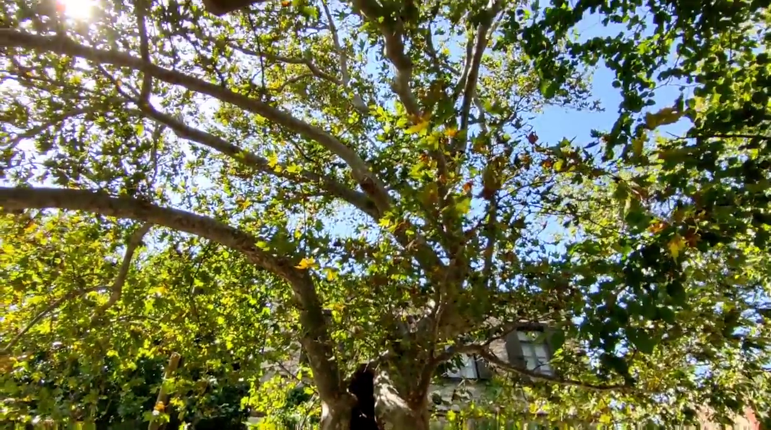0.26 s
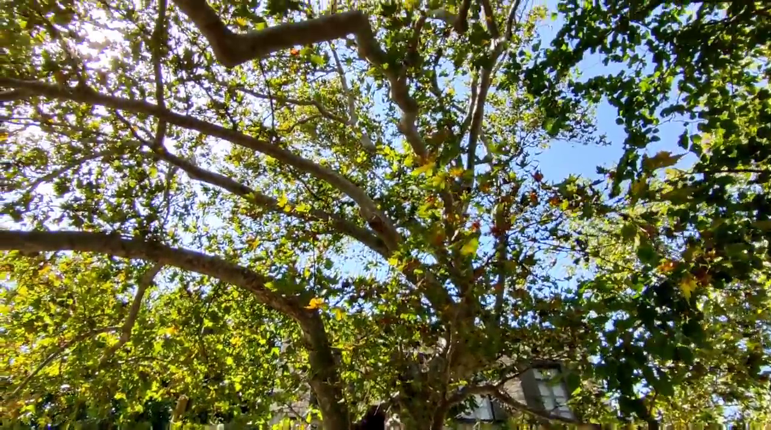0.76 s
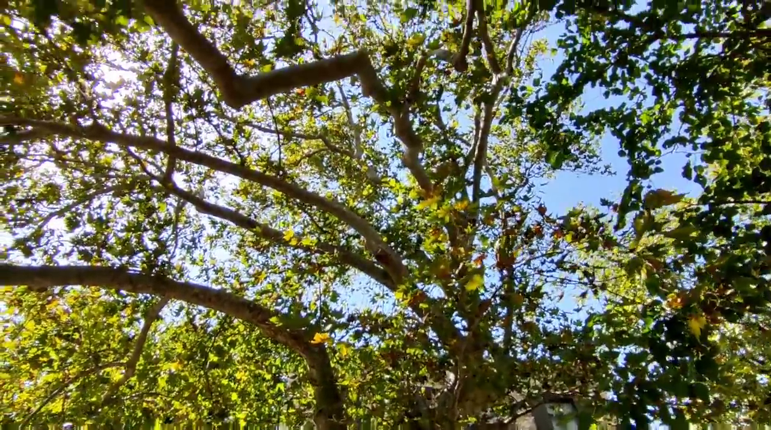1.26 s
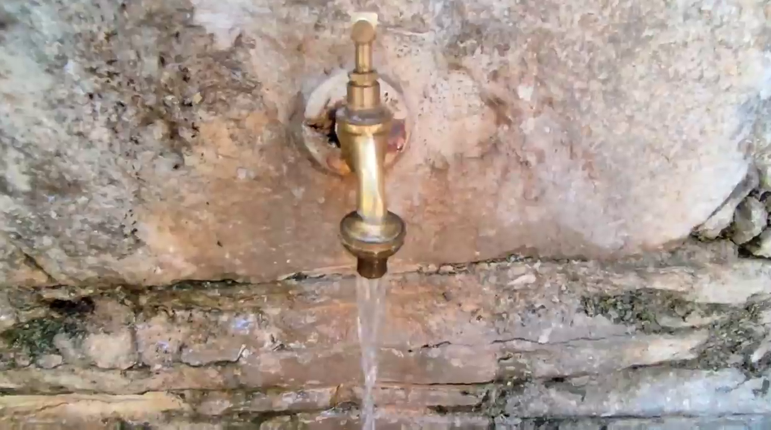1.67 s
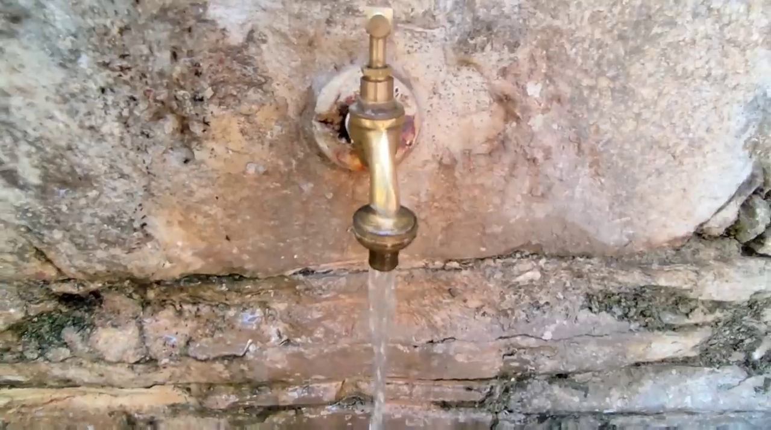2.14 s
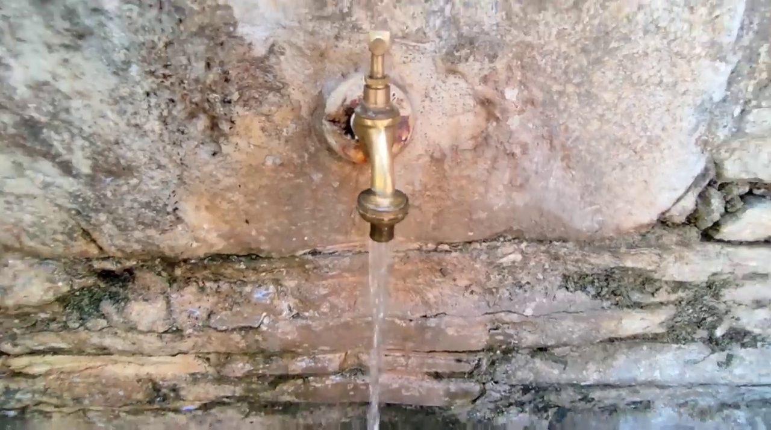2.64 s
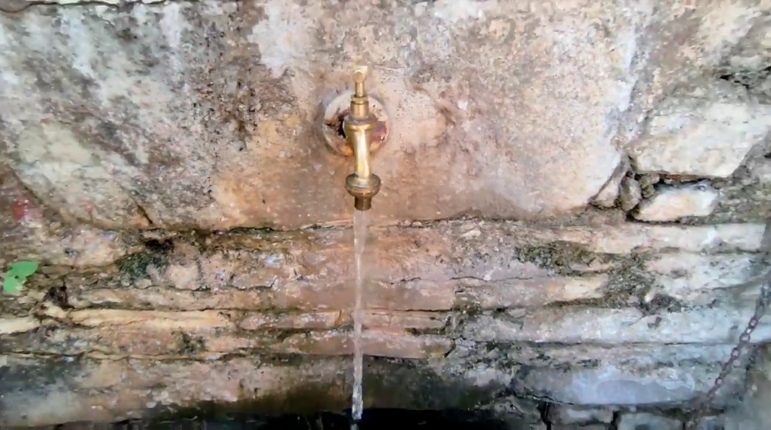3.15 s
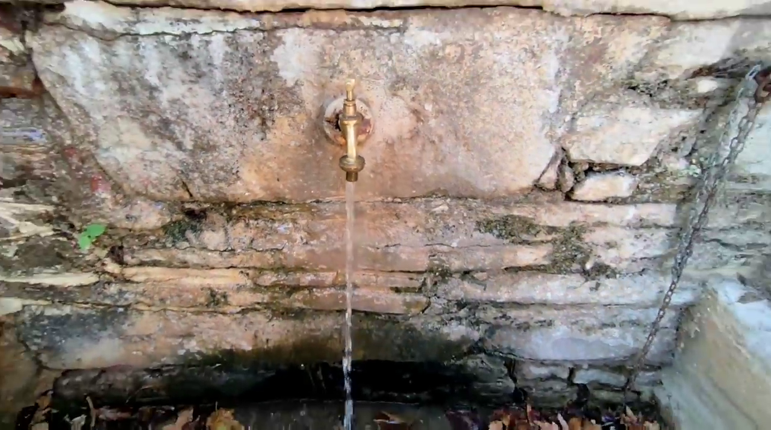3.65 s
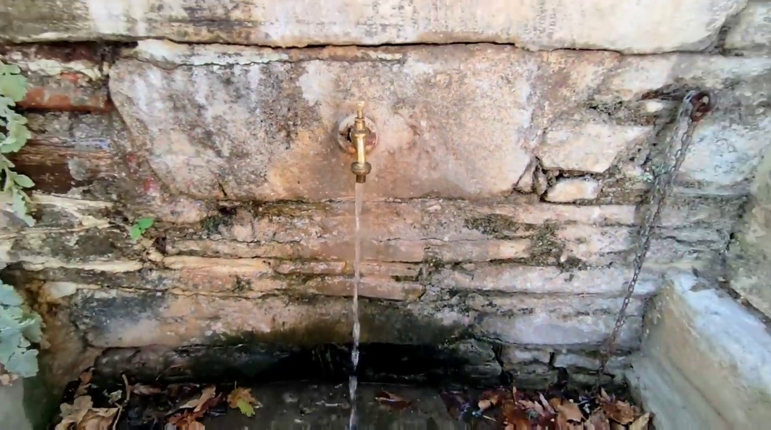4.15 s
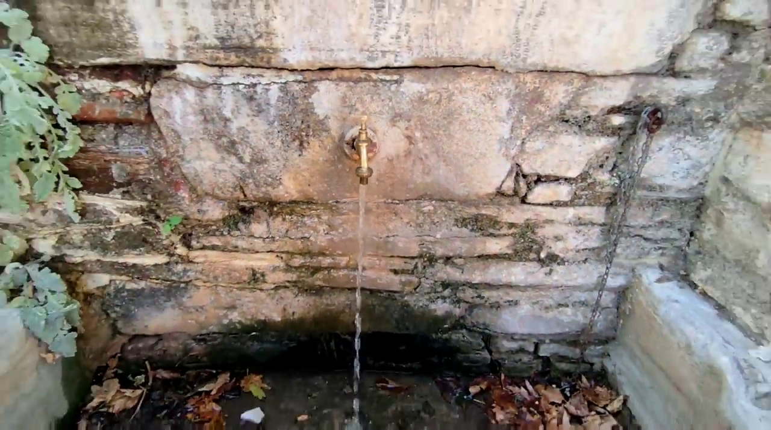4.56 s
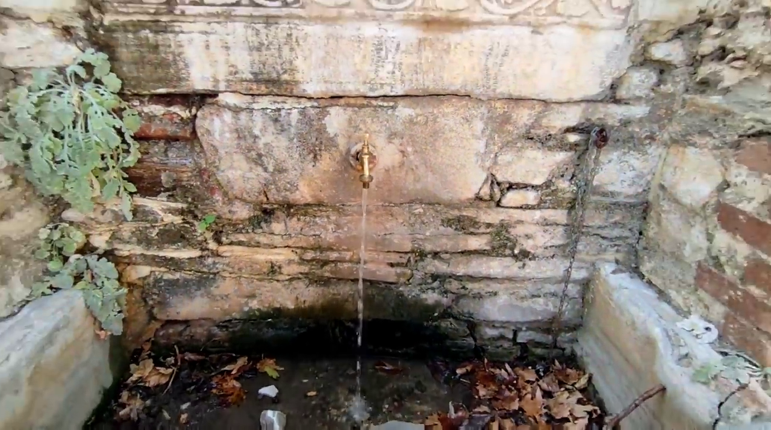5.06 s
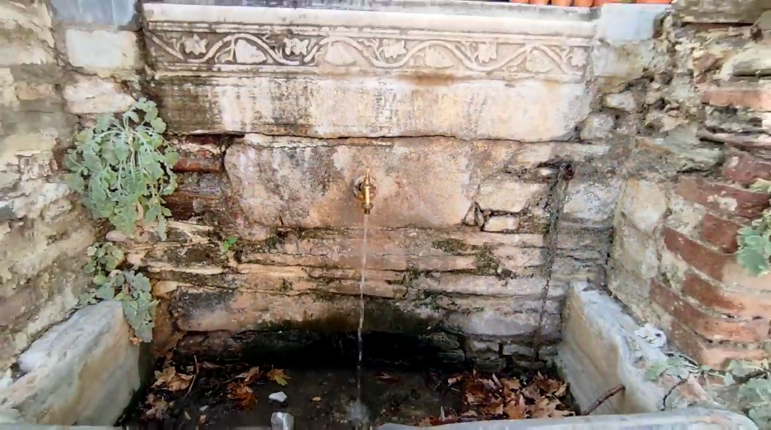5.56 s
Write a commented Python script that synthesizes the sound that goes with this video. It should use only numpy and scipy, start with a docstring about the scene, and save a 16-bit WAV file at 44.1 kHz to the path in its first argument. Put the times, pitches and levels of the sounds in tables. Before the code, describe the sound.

From 0 to 1.7 s, a quiet open-air village square under trees: a thin, high, continuous rasp of distant cicadas and a faint airy wash. The start is fairly calm; from about 0.55 s light gusts flutter low against the microphone, with dull thumps near 0.7, 0.8 and 1.1 s and a cluster from 1.25 to 1.55 s. A few tiny dry ticks are barely audible. At 1.72 s it cuts hard to a fountain, sheltered from wind. A thin tap stream falls into a shallow stone basin: hollow mid-low gulps, rising plinks, bubbly fizz, crisp spatter and slaps, liveliest until about 3 s, with short close stone reflections. From 3 to 3.5 s the microphone backs away and the tone shifts; isolated droplets tick sharply, notably near 4 s. From 2.3 s a nearer cicada gives soft-edged, buzzy chirps nearly three per second. Water thins after 5 s, continuing to the end near 5.8 s.

```python
"""Village cicadas and an old fountain

Cicadas rasp in the trees of a village square while a breeze buffets the microphone: both are shaped noise.
From 1.7 s the scene is an old fountain: a thin stream from a tap falls into a shallow stone basin
in a stone niche. It gulps, plinks and fizzes as ringing bubbles, and spatters as bursts of noise.
One nearer cicada chirps on above it; its chirps are noise rasped by fast clicks."""
import sys
import numpy as np
from scipy import signal
from scipy.fft import rfft, irfft, next_fast_len
from scipy.io import wavfile
from scipy.ndimage import uniform_filter1d, map_coordinates

SR = 44100
rng = np.random.default_rng(int(sys.argv[2]) if len(sys.argv) > 2 else 0)


def log_audio(samples):
    """Write samples as a 16-bit WAV file to the path given in sys.argv[1]."""
    # one column per channel
    frames = np.atleast_2d(samples).T
    # limit to full scale, then quantise
    limited = np.clip(frames, -1, 1)
    pcm = np.round(limited * 32767).astype(np.int16)
    wavfile.write(sys.argv[1], SR, pcm)


N = 256220

# Levels in the tables set the balance inside a layer; trims, filters and echoes may follow.
# Colours give only the shape of a spectrum.

# far outdoor wash [t/s, level/dB], its colour and the colour of the open air [f/Hz, level/dB]
WASH_LEVEL = [(0, -66.5), (.4, -67), (.7, -78.5), (1.1, -82), (1.28, -65.5), (1.5, -69), (1.68, -76)]
WASH_COLOUR = [(150, -8), (350, 9), (650, -3.5), (1050, 7), (1450, -9.5), (2500, -26), (4000, -14.5),
               (14000, -14)]
AIR_COLOUR = [(20, 10), (45, -6), (100, -5), (200, -14.5), (400, -29), (800, -16.5), (3000, -77)]
# gusts on the microphone [start t/s, length/s, level/dB]
GUSTS = [(-0.017, 0.29, -58), (0.545, 0.21, -51), (0.6, 0.11, -58.5), (0.809, 0.11, -53),
         (1.055, 0.18, -51.5), (1.293, 0.062, -56), (1.464, 0.17, -52)]
# single eddies that thump across the microphone port [t/s, peak level/dB]
THUMPS = [(0.681, -35), (0.815, -38), (1.132, -36.5), (1.259, -37.5), (1.378, -40), (1.412, -35),
          (1.452, -37), (1.475, -41), (1.561, -39.5)]
# colours of quick and slow eddies [f/Hz, level/dB]
QUICK_EDDY_COLOUR = [(12, -40), (25, -10), (45, -5.5), (80, 3), (160, -12), (250, -20.5), (400, -40),
                     (600, -98)]
SLOW_EDDY_COLOUR = [(12, -28), (25, 15.5), (45, 10), (90, -22), (250, -56)]
# faint dry ticks [t/s, level/dB] and their colour [f/Hz, level/dB]
TICKS = [(.145, -61), (1.258, -62), (1.692, -57.5)]
TICK_COLOUR = [(60, -15), (250, 1), (1500, 5.5), (3300, 8), (5000, 2.5), (14000, -20)]

# loudness of the cicadas in the trees before the fountain scene [t/s, level/dB]
CHORUS_LEVEL = [(0, -59.5), (1.25, -60), (1.43, -56.5), (1.68, -63.5)]
# two cicadas that stand out of the chorus [f/Hz, level over the chorus/dB]
SOLOISTS = [(4300, -14.5), (5000, -4.5)]
# chirps of the nearer cicada, all equally loud [start t/s, length/s]
CHIRPS = [(2.303, 0.34), (2.65, 0.28), (2.976, 0.22), (3.267, 0.29), (3.636, 0.26), (4.01, 0.21),
          (4.337, 0.17), (4.78, 0.27), (5.168, 0.21), (5.532, 0.22)]
# colours of the far and the near cicadas [f/Hz, level/dB]
TREE_COLOUR = [(1400, -28.5), (2200, -11.5), (3000, -17.5), (3500, -23.5), (4250, -2.5), (4650, -7),
               (5050, -16), (5500, -16.5), (7800, -16), (8600, -27.5), (14000, -38)]
NEAR_COLOUR = [(1800, -26), (2400, -3), (3400, -10.5), (4500, 4), (5100, 2.5), (5900, -5), (6500, -1),
               (7300, 1.5), (8000, -14.5), (10000, -17), (14000, -21.5)]

# strength of the stream [t/s, bubbling level/dB, spray level/dB]
STREAM = [(1.75, -42, -54.5), (2.1, -41.5, -53.5), (2.55, -40.5, -51.5), (3.05, -44, -53),
          (3.6, -41, -56.5), (4.4, -43.5, -56), (4.65, -44, -57.5), (5.1, -47.5, -59.5),
          (5.8, -48.5, -60.5)]
# colours of the spray and of the small bubbles' fizz [f/Hz, level/dB]
SPRAY_COLOUR = [(200, -10), (600, -4), (1400, -0.5), (2200, 0), (3300, 1), (4500, -1), (5800, -7),
                (7100, -1), (8200, -13.5), (9800, -8), (14000, -13)]
FIZZ_COLOUR = [(500, 7.5), (900, -8.5), (1500, -22), (2200, 6), (3100, -28), (4500, -5), (7000, -0.5),
               (9000, -18)]
# the biggest air pockets dragged under by the stream [t/s, peak level/dB, f/Hz]
GULPS = [(1.727, -34.5, 583), (1.768, -35, 633), (1.786, -27.5, 484), (1.8, -30, 523), (1.897, -34, 531),
         (1.941, -33.5, 497), (2, -41, 543), (2.065, -35.5, 592), (2.209, -37, 552), (2.225, -40, 488),
         (2.305, -27.5, 524), (2.37, -36, 520), (2.407, -32, 540), (2.589, -31, 522), (2.65, -33, 562),
         (2.837, -27.5, 566), (2.936, -32.5, 470), (3.003, -38, 574), (3.279, -40, 420), (3.342, -36, 565),
         (3.499, -38, 563), (3.524, -31.5, 494), (3.603, -36, 582), (3.671, -29.5, 516), (3.726, -42, 494),
         (3.757, -40, 562), (3.845, -39, 534), (3.897, -37.5, 512), (4.046, -31.5, 534), (4.1, -33, 506),
         (4.17, -36.5, 590), (4.276, -31, 544), (4.656, -39, 587), (4.699, -39.5, 535), (4.714, -38, 522),
         (4.765, -35.5, 520), (4.792, -39.5, 546), (5.054, -44.5, 500), (5.125, -44.5, 483),
         (5.263, -31.5, 528), (5.352, -45.5, 565), (5.414, -41.5, 520), (5.521, -43.5, 550),
         (5.565, -44, 575)]
# gulp tails that glide upward as the pocket shrinks [start t/s, level/dB, end f/Hz]
GLIDES = [(1.902, -44.5, 890), (2.003, -41.5, 877), (2.846, -43, 915), (3.6, -61, 695), (3.757, -48, 670),
          (3.898, -46, 740)]
# flurries of middling bubbles that climb in pitch as a cavity closes [middle t/s, level/dB, f/Hz]
PLINKS = [(1.783, -38.5, 1050), (2.287, -39, 1430), (2.382, -41, 1020), (2.648, -44, 706),
          (2.864, -37.5, 1310), (3.001, -37, 894), (3.051, -41, 1210), (3.283, -38.5, 1226),
          (3.319, -38, 1280), (3.594, -41.5, 930), (4.133, -40, 1410), (4.297, -40.5, 1020),
          (4.826, -48, 860), (4.893, -49, 900), (5.108, -51.5, 960), (5.377, -43.5, 1350)]
# the biggest lumps of water, which burst into small bubbles [middle t/s, level/dB, f/Hz, length/s]
SPLASHES = [(1.721, -45.5, 2330, 0.024), (1.779, -44, 2540, 0.013), (1.824, -37.5, 2510, 0.031),
            (1.929, -37.5, 2500, 0.02), (1.967, -41, 2430, 0.016), (2.034, -41, 2530, 0.026),
            (2.09, -36, 2730, 0.023), (2.174, -34.5, 3550, 0.011), (2.261, -41, 2600, 0.019),
            (2.326, -42.5, 1890, 0.018), (2.391, -36.5, 3650, .018), (2.456, -40, 3720, 0.027),
            (2.539, -40.5, 2220, 0.031), (2.616, -42, 3300, 0.015), (2.725, -47, 2200, 0.02),
            (2.756, -44, 2130, 0.019), (2.865, -41.5, 2110, 0.023), (2.889, -38.5, 2360, 0.019),
            (2.96, -44, 2310, 0.023), (3.013, -50, 2730, 0.017), (3.152, -41, 3400, 0.011),
            (3.477, -36.5, 2020, 0.027), (3.528, -36.5, 2210, 0.024), (3.677, -37.5, 1825, 0.017),
            (3.873, -35, 2970, 0.012), (4.064, -41, 2640, 0.01), (4.368, -42.5, 2280, 0.025),
            (4.414, -39, 2940, 0.016), (4.465, -38, 2040, 0.021), (4.558, -42, 2740, 0.028),
            (4.782, -43, 3200, .02), (5.086, -44, 1940, 0.019), (5.781, -45.5, 2410, 0.035)]
# the hardest drops that slap on wet stone [t/s, level/dB] and their colour [f/Hz, level/dB]
SLAPS = [(1.8188, -31), (1.8793, -34.5), (2.0249, -32), (2.113, -31.5), (2.176, -34.5), (2.4535, -35.5),
         (2.6053, -35), (2.8808, -32.5), (4.4774, -35)]
SLAP_COLOUR = [(500, -42), (1500, -4), (3000, 1), (7000, 14), (8300, 3.5), (11000, 5.5), (14000, 3)]
# fine droplets that tick sharply on the stone [t/s, level/dB] and their colour [f/Hz, level/dB]
DROPLETS = [(3.1427, -35), (3.2275, -35), (3.9825, -26), (4.2232, -30), (4.8628, -31), (5.1292, -32),
            (5.4719, -30)]
DROPLET_COLOUR = [(1500, -13), (4500, -2.5), (8500, -6.5)]

# time for the niche's echo to die away by 60 dB [f/Hz, t60/s]
NICHE_DECAY = [(300, 0.082), (2000, 0.07), (12000, 0.097)]
# pitches that the basin's hollow, and the gap under the wall, boost or swallow [f/Hz, width/Hz, level/dB]
BASIN = [(335, 120, 6), (435, 66, -4), (566, 49, 2), (677, 36, 6), (701, 53, -6.5)]
RECESS = [(1365, 95, 4), (1490, 600, -2), (1914, 74, 5), (2080, 370, -3.5), (2960, 380, -4.5),
          (7180, 350, 1.5)]
# further boosts and dips, close to the tap and from a step back [f/Hz, width/Hz, level/dB]
BY_THE_TAP = [(780, 41, 7.5), (970, 160, -3.5), (2157, 44, 7)]
STEPPED_BACK = [(765, 71, -7), (898, 86, 7.5), (960, 43, 4)]

FOUNTAIN_START_S, STREAM_FADE_S = 1.72, 0.004
STEP_BACK_S, STEP_LENGTH_S = 2.98, 0.47
CALM_DB, FLUTTER_DB = -51, 2.1  # wind strength without gusts, depth of its flutter
BRISK_DB = -43  # wind strength at which the quick eddies are fully there
SLOW_EDDY_DB = -3  # slow eddies, relative to the wind strength
THUMP_WIDTH_S, GUST_EDGE_S, CHIRP_EDGE_S = 0.0021, 0.009, 0.03
CHORUS_AT_FOUNTAIN_DB, CHIRP_DB = -55.5, -46
GULP_FROM, GULP_TO, GULP_GLIDE_S = 0.793, 1.1, 0.012  # pitch climbs between these shares of its own
GULP_ATTACK_S, GULP_DECAY_S = 0.003, 0.0075
GULP_TAIL_DB, GULP_TAIL_S = -27, 0.023
GLIDE_FROM_HZ, GLIDE_S = 550, 0.035
TOP_HZ = 14350  # nothing sounds above this


def amp(db):
    """Decibels to a plain factor."""
    return 10 ** (np.asarray(db) / 20)


def unit(x):
    """x scaled to an average strength (rms) of 1."""
    return x / np.sqrt(np.mean(x ** 2) + 1e-20)


def clock():
    """The time of every sample in seconds."""
    return np.arange(N) / SR


def along(points, hz):
    """Read a curve of (Hz, value) points on a log axis."""
    f, v = np.transpose(points)
    return np.interp(np.log(hz + 1), np.log(f + 1), v)


def curves(rows):
    """One value per sample for each column after the time."""
    s, *columns = np.transpose(rows)
    return [np.interp(clock(), s, column) for column in columns]


def wobble(rate):
    """A smooth random curve with rate random points a second."""
    return map_coordinates(rng.standard_normal(int(N * rate / SR) + 4), [clock() * rate])


def filtered(x, response):
    """x times a response that depends on frequency."""
    m = next_fast_len(N + SR // 2)
    return irfft(rfft(x, m) * response(np.fft.rfftfreq(m, 1 / SR)), m)[:N]


def coloured(x, spectrum):
    """x shaped by (Hz, dB) points."""
    return filtered(x, lambda hz: amp(along(spectrum, hz)))


def noise(spectrum):
    """Coloured noise of rms 1."""
    return unit(coloured(rng.standard_normal(N), spectrum))


def patchy(x, depth_db):
    """Random patches of time and pitch make x louder or softer."""
    z = signal.stft(x, nperseg=512)[2]
    patches = uniform_filter1d(rng.standard_normal(z.shape), size=5, axis=0)
    patches = uniform_filter1d(patches, size=6, axis=1)
    return signal.istft(z * amp(depth_db * unit(patches)), nperseg=512)[1][:N]


def add(track, s, sound):
    """Mix a sound into the track at s seconds."""
    part = track[max(round(s * SR), 0):][:len(sound)]
    part += sound[:len(part)]


def burst_shape(start, length, edge):
    """Rise, hold and fall, with soft edges of so many seconds."""
    return (np.tanh((clock() - start) / edge) - np.tanh((clock() - start - length) / edge)) / 2


def cracks(rows, spectrum, t60, gain_db, attack):
    """Short grainy noise bursts, one for each (s, dB) row; t60 and attack in seconds."""
    out, t = np.zeros(N), np.arange(SR // 16) / SR
    for s, db in rows:
        grains = rng.standard_normal(len(t)) * amp(rng.standard_normal(len(t)))
        shape = amp(db + gain_db - 60 * t / t60) * (1 - np.exp(-t / attack))
        add(out, s, shape * grains)
    return coloured(out, spectrum)


def ticks():
    """Faint dry ticks: short bursts of noise that start almost at once."""
    return cracks(TICKS, TICK_COLOUR, t60=0.035, gain_db=10.5, attack=0.0004)


def thumps():
    """A passing eddy first sucks at the port, then pushes."""
    ages = [((clock() - s) / THUMP_WIDTH_S, db) for s, db in THUMPS]
    return sum(amp(db) * u * np.exp((1 - u ** 2) / 2) for u, db in ages)


def breeze():
    """Gusts flutter, brighter as they grow, over the wash of the open air; the fountain is sheltered."""
    wash_db, = curves(WASH_LEVEL)
    calm = amp(CALM_DB) * np.clip((FOUNTAIN_START_S - clock()) / 0.014, 0, 1)
    gusts = sum(amp(db) * burst_shape(s, length, GUST_EDGE_S) for s, length, db in GUSTS)
    pressure = calm + gusts
    eddies = noise(QUICK_EDDY_COLOUR)
    # even turbulence: the wind and the flutter alone set its strength
    eddies = eddies / np.sqrt(uniform_filter1d(eddies ** 2, size=1500))
    briskness = np.clip(pressure / amp(BRISK_DB), 0, 1) ** 1.95
    quick = briskness * amp(FLUTTER_DB * wobble(67.0)) * eddies
    slow = amp(SLOW_EDDY_DB) * noise(SLOW_EDDY_COLOUR)
    wash = amp(wash_db) * noise(WASH_COLOUR)
    air = amp(-63.5) * noise(AIR_COLOUR)
    return pressure * (quick + slow) + thumps() + wash + air


def rasp(spectrum, click_hz, depth):
    """A cicada's tymbals buckle a few hundred times a second; the trees smear the clicks."""
    phase = np.cumsum(click_hz * (1 + 0.021 * wobble(30))) / SR
    clicks = 1 + depth * np.exp(-4 * (phase % 1))
    return unit(coloured(patchy(clicks * rng.standard_normal(N), depth_db=1.5), spectrum))


def far_cicadas():
    """A rasping chorus, and two voices of narrow noise that swell and fade."""
    chorus_db, = curves(CHORUS_LEVEL)
    chorus_db = np.where(clock() < FOUNTAIN_START_S, chorus_db, CHORUS_AT_FOUNTAIN_DB)
    chorus = rasp(TREE_COLOUR, click_hz=213, depth=0.39)
    for hz, db in SOLOISTS:
        narrow = [(hz / 2, -120), (hz, 0), (hz * 2, -120)]
        chorus = chorus + amp(db + 2.4 * wobble(11)) * noise(narrow)
    return amp(chorus_db) * chorus


def near_cicada():
    """One insect switches its rasp on and off softly, nearly three times a second."""
    singing = sum(burst_shape(s, length, CHIRP_EDGE_S) for s, length in CHIRPS)
    return amp(CHIRP_DB) * singing * rasp(NEAR_COLOUR, click_hz=219.0, depth=0.1)


def niche(x, wet_db):
    """Close stone walls answer; the echo pattern shifts as the splash point wanders."""
    out, hop = np.zeros(N), SR // 8
    for start in range(0, N, hop):
        # a fresh echo of fading noise for every eighth of a second
        hz, t, z = signal.stft(rng.standard_normal(SR // 5), SR, nperseg=256)
        fade = amp(-60 * t / along(NICHE_DECAY, hz)[:, None])
        tail = signal.istft(z * fade, SR, nperseg=256)[1]
        echo = signal.fftconvolve(x[start:start + hop], tail / np.linalg.norm(tail))
        add(out, start / SR + 0.002, echo)
    return (x + amp(wet_db) * out) / np.hypot(1, amp(wet_db))


def resonate(x, modes):
    """A hollow rings at some pitches and swallows others: a chain of (Hz, width Hz, dB) boosts and dips."""
    def response(f):
        total = 1
        for centre, width, db in modes:
            offset = centre ** 2 - f ** 2
            top = offset + 1j * f * width * amp(db / 2)
            total = total * top / (offset + 1j * f * width / amp(db / 2))
        return total
    return filtered(x, response)


def strays(count, over_db, spread_db):
    """Lesser drops and bubbles at a ragged pace, following the stream's bubbling: rows of (s, dB)."""
    when, strength = rng.random((count, 2)).T
    s = FOUNTAIN_START_S + (np.arange(count) + when) / count * (N / SR - FOUNTAIN_START_S)
    knots, bubbling_db, _ = np.transpose(STREAM)
    return list(zip(s, np.interp(s, knots, bubbling_db) + over_db + spread_db * (strength - 0.5)))


def stray_bubbles(count, over_db, spread_db, low_hz, high_hz):
    """Strays of random size: rows of (s, dB, pitch Hz)."""
    rows = strays(count, over_db, spread_db)
    return [(s, db, low_hz * (high_hz / low_hz) ** rng.random()) for s, db in rows]


def bubble(t, hz, cycles, rise, swell):
    """A ringing bubble whose pitch climbs as it nears the surface; it decays to 1/e in so many cycles."""
    age = t * hz / cycles
    shape = (1 - np.exp(-age / swell)) * np.exp(-age)
    shape = shape / shape.max(axis=-1, keepdims=True)
    return shape * np.sin(2 * np.pi * hz * t * (1 + rise * age / 2))


def swarm(count, low_hz, high_hz, cycles, rise, spread_db):
    """Bubbles of random size at a ragged but steady pace, of uneven loudness; rms 1 in all."""
    out, t = np.zeros(N), np.arange(int(5 * cycles / low_hz * SR)) / SR
    when, size, strength, life = rng.random((count, 4)).T
    hz = low_hz * (high_hz / low_hz) ** size
    rings = bubble(t, hz[:, None], cycles * (0.5 + life[:, None]), rise, swell=0.15)
    times = (np.arange(count) + 2 * when) / count * N / SR
    gains = amp(spread_db * strength ** 2) * np.sqrt(hz)
    for s, gain, ring in zip(times, gains, rings):
        add(out, s, gain * ring)
    return unit(out)


def flurry(hz, length, scatter, climb, cycles, count):
    """A quick run of bubbles, rms 1 at its loudest; scatter and climb of the pitch in octaves."""
    out, t = np.zeros(SR // 10), np.arange(SR // 50) / SR
    progress = (np.arange(count) + rng.random(count)) / count
    pitch = hz * 2 ** (scatter * rng.standard_normal(count) + climb * (progress - 0.5))
    # the run swells and fades
    sizes = np.sqrt(np.sin(np.pi * progress)) * amp(2.1 * rng.standard_normal(count))
    rings = bubble(t, pitch[:, None], cycles, rise=0.077, swell=0.057)
    for u, size, ring in zip(progress, sizes, rings):
        add(out, u * length, size * ring)
    return out / np.sqrt(uniform_filter1d(out ** 2, size=350).max())


def spray(level_db):
    """Fine droplets crackle in uneven clumps; random patches of time and pitch vary the noise."""
    droplets = rng.standard_normal(N) * (rng.random(N) < 11000 / SR)  # about 11000 a second
    clumps = amp(1.93 * wobble(45) + 2.9 * wobble(170))
    return amp(level_db + 10.0) * unit(coloured(patchy(droplets * clumps, depth_db=4.5), SPRAY_COLOUR))


def bubbling(level_db):
    """A dense fizz of small short-lived bubbles, and sparser ones that ring and glide."""
    fizz = swarm(count=2000, low_hz=705, high_hz=7280, cycles=4.4, rise=0.022, spread_db=16)
    plips = swarm(count=170, low_hz=1728, high_hz=5140, cycles=14.5, rise=0.0356, spread_db=6.5)
    return amp(level_db - 8.5) * unit(coloured(fizz, FIZZ_COLOUR)) + amp(level_db - 10.0) * plips


def churning(level_db):
    """The stream churns up weak, quickly damped pockets, and its own cavity keeps ringing."""
    churn = swarm(count=420, low_hz=330, high_hz=996, cycles=2.1, rise=0.093, spread_db=9.5)
    cavity = swarm(count=130, low_hz=508, high_hz=587, cycles=7.1, rise=0.033, spread_db=-2.5)
    return amp(level_db - 14.5) * churn + amp(level_db - 14) * cavity


def slaps():
    """Drops hit the wet stone: hard ones slap, fine ones tick and echo in the niche."""
    hard = cracks(SLAPS, SLAP_COLOUR, t60=0.027, gain_db=-3.5, attack=0.0012)
    drops = list(DROPLETS) + strays(count=12, over_db=-1, spread_db=5.0)
    fine = cracks(drops, DROPLET_COLOUR, t60=0.011, gain_db=3, attack=0.0001)
    return hard + niche(fine, wet_db=-2.0)


def splashes():
    """Each lump of water bursts into a cluster of small bubbles."""
    out = np.zeros(N)
    for s, db, hz, length in SPLASHES:
        cluster = flurry(hz, length, scatter=0.16, climb=0.18, cycles=3.96, count=11)
        add(out, s - length / 2, amp(db - 1) * cluster)
    return out


def plinks(length=0.018):
    """Closing cavities gurgle upward; single lesser bubbles plink softly in between."""
    out, t = np.zeros(N), np.arange(SR // 25) / SR
    for s, db, hz in PLINKS:
        gurgle = flurry(hz, length, scatter=0.045, climb=0.076, cycles=3.1, count=4)
        add(out, s - length / 2, amp(db - 5) * gurgle)
    for s, db, hz in stray_bubbles(count=70, over_db=-7, spread_db=10.5, low_hz=887, high_hz=2720):
        add(out, s, amp(db) * bubble(t, hz, cycles=10.1, rise=0.068, swell=0.26))
    return out


def glides():
    """A shrinking air pocket rings on, climbing ever faster in pitch."""
    out, u = np.zeros(N), np.linspace(0, 1, int(GLIDE_S * SR))
    shape = np.sqrt(np.abs(np.sin(np.pi * u)))
    for s, db, end_hz in GLIDES:
        hz = GLIDE_FROM_HZ + (end_hz - GLIDE_FROM_HZ) * u ** 2
        add(out, s, amp(db) * shape * np.sin(2 * np.pi * np.cumsum(hz) / SR))
    return out


def gulps():
    """Big pockets collapse in a short, soft plop whose pitch slides up, then ring on faintly."""
    out, t = np.zeros(N), np.arange(SR // 10) / SR
    for s, db, hz in GULPS:
        glide_s = GULP_GLIDE_S * amp(rng.normal(0, 3.46))
        decay_s = GULP_DECAY_S * amp(rng.normal(0, 1))
        pitch = hz * (GULP_TO + (GULP_FROM - GULP_TO) * np.exp(-t / glide_s))
        body = np.exp(-t / decay_s) + amp(GULP_TAIL_DB) * np.exp(-t / GULP_TAIL_S)
        shape = (1 - np.exp(-(t / GULP_ATTACK_S) ** 2)) * body
        add(out, s, amp(db) * shape / shape.max() * np.sin(2 * np.pi * np.cumsum(pitch) / SR))
    return out


def fountain():
    """All the water, heard through basin and niche; its colour shifts as the microphone backs away."""
    bubbling_db, spray_db = curves(STREAM)
    running = np.clip((clock() - FOUNTAIN_START_S) / STREAM_FADE_S, 0, 1)
    patter = running * (bubbling(bubbling_db) + spray(spray_db))
    gurgle = gulps() + glides() + running * churning(bubbling_db)
    water = niche(gurgle, wet_db=-11.5)
    water = water + niche(plinks() + splashes(), wet_db=-10.0)
    water = water + amp(-1.72) * niche(patter, wet_db=-1.5)
    water = resonate(water, list(BASIN) + list(RECESS))
    away = np.clip((clock() - STEP_BACK_S) / STEP_LENGTH_S, 0, 1)
    close = (1 - away) * resonate(water, BY_THE_TAP)
    return close + away * resonate(water, STEPPED_BACK) + slaps()


def scene():
    """Wind, a few faint ticks, insects and water at one microphone."""
    return (breeze() + ticks() + far_cicadas() + near_cicada() + fountain())[None]


def record(dry):
    """Everything above the band limit is cut away."""
    return np.array([filtered(x, lambda hz: hz < TOP_HZ) for x in dry])


dry = scene()
out = record(dry)
log_audio(out)
```